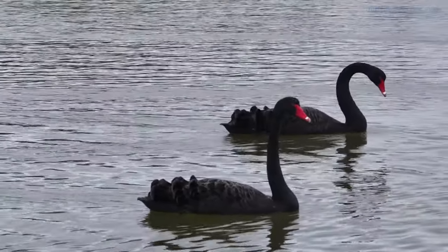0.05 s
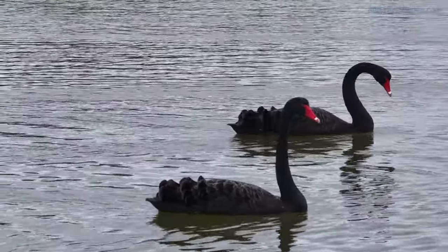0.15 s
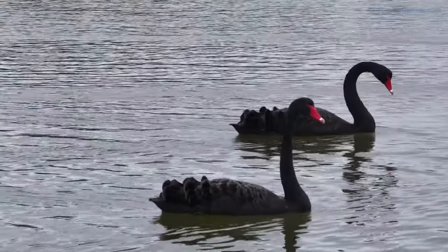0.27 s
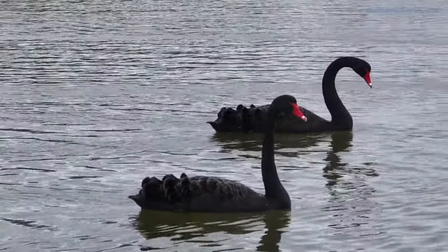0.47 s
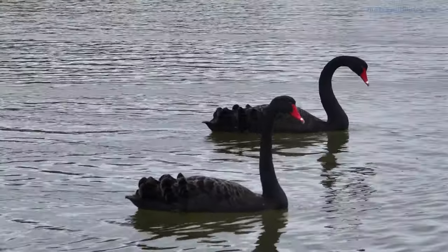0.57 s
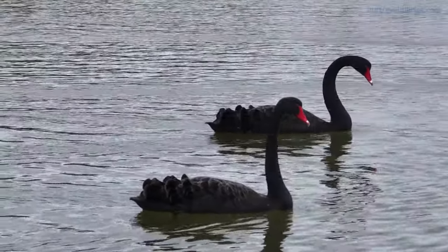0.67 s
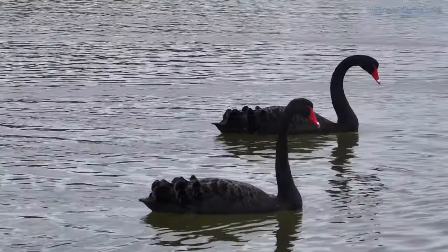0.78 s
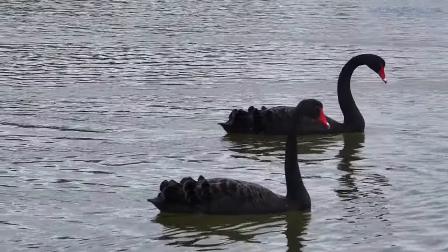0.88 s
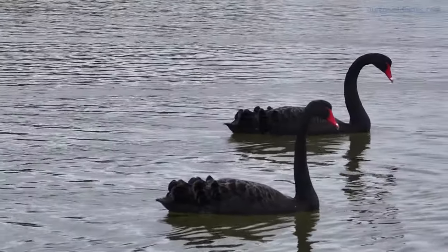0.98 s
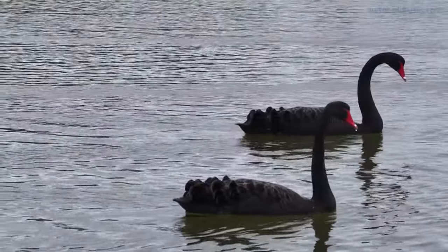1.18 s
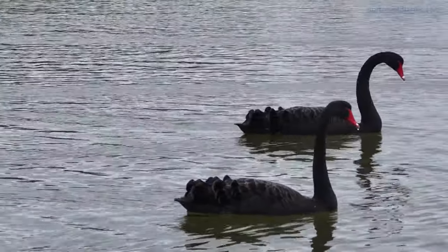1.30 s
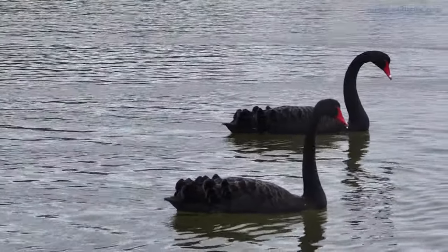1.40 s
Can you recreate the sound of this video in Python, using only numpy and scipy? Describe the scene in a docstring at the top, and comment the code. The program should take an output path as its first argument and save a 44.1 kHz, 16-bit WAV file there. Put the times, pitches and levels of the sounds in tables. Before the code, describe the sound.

A black swan honks once, starting with a rasp that clears into a falling bugle note and breaks lower. Soft breeze and ripples continue on the lake, with faint toots and chirps from distant birds.

```python
"""On a lake, a black swan calls once over a wash of breeze and ripples, in which tiny bubbles ring.
Its syrinx is the source and its throat the filter: a second vibration chops the start into a rasp,
which settles into a clear, sagging bugle note and then breaks to a lower one. Distant waterbirds toot,
a ripple slaps and a small bird chirps far off. Ripples and the bank scatter a faint echo of the calls."""
import sys
import numpy as np
from scipy import signal
from scipy.fft import rfft, irfft
from scipy.io import wavfile
from scipy.ndimage import uniform_filter1d

SR = 44100
rng = np.random.default_rng(int(sys.argv[2]) if len(sys.argv) > 2 else 0)


def master_out(mix):
    """Clip the mix to full scale and print it as 16-bit PCM to the path in sys.argv[1]."""
    frames = np.transpose(np.atleast_2d(mix))
    ceiling = np.clip(frames, -1, 1)
    pcm = np.round(ceiling * 32767).astype(np.int16)
    wavfile.write(sys.argv[1], SR, pcm)


N = 63945
T = np.arange(N) / SR

# spectrum of breeze and water (frequency [Hz], relative density [dB])
WASH_SPECTRUM = [(15, -63), (30, -35), (45, -20), (62, -12.5), (85, -4), (125, 1), (170, -2.5), (250, -4.5),
                 (325, -1.5), (480, -8), (650, -12.5), (830, -8.5), (1100, -12), (2500, -17.5), (3500, -23),
                 (5000, -31.5), (8000, -34), (12000, -40), (15800, -47)]
# clear droplets (time [s], ring frequency [Hz], relative level [dB], decay time [s])
DROPLETS = [(.0365, 10650, -44, 0.0005), (.192, 6200, -56, .001), (.698, 9200, -49, 0.00039),
            (.728, 5630, -54, 0.00046), (.801, 6970, -59, .001), (.833, 8050, -52.5, 0.00042),
            (0.932, 10700, -57, 0.00076), (.9663, 10900, -50, 0.00028), (1.008, 7150, -57, 0.00036),
            (1.037, 9900, -55, 0.00056), (1.1907, 7140, -40, 0.00033), (1.242, 5040, -58, 0.0015),
            (1.317, 10400, -42, 0.00021)]
# waterbird calls (time [s], duration [s], top pitch [Hz], relative level [dB])
WATERBIRD_TOOTS = [(.04, .034, 1005, -48), (.932, .022, 1600, -58)]
# the swan's two notes (time [s], pitch [Hz], relative level [dB], roll-off [dB per harmonic])
UPPER_NOTE = [(.205, 1165, -53, 4), (.215, 1252, -29, 5.5), (.222, 1207, -21.5, 0), (.25, 1208, -20, 1.5),
              (.268, 1226, -22.5, 1), (.282, 1230, -19, 0.5), (.305, 1194, -21, 1.5), (.33, 1180, -22.5, 1),
              (.375, 1177, -24.5, -0.5), (.41, 1170, -25, 0.5), (.445, 1150, -26, 0.5),
              (.475, 1124, -28.5, 0), (.501, 1079, -28, 0), (.508, 1108, -31.5, 11), (.515, 1023, -32, 5.5),
              (.524, 1050, -58, 10)]
LOWER_NOTE = [(.512, 980, -46, 3), (.52, 964, -33, 10.5), (.526, 958, -29, 2.7), (.542, 947.7, -31.5, -0.5),
              (.57, 921, -33, 0), (.586, 891, -34.5, 1), (.595, 886, -39, 4.5), (.604, 862, -46, 4),
              (.615, 868, -67, 3)]
# make-up of the rasp (time [s], share of the voice [0-1], pitch lift [Hz], roughness [0-1])
RASP_TEXTURE = [(.213, 0.91, 152.5, 0.42), (.2225, 0.71, 23, 0.48), (.233, 0.95, 119, 0.96),
                (.25, 0.97, 247, 1), (.263, 0.92, 206, 0.88), (.273, 0.84, 132, 0.25),
                (.297, 0.86, 63, 0.1), (.312, 0.38, 58, 0.08), (.335, 0.01, -2, 0.08)]
# the vibration that chops the voice (time [s], rate of main bursts [Hz])
CHOP_RATE = [(.213, 150), (.2226, 97), (.24, 102), (.258, 97), (.274, 118), (.294, 118), (.308, 142)]
# throat response in the rasp, the upper note and the lower note (frequency [Hz], relative gain [dB])
THROAT_RASP = [(300, -41), (700, -15.5), (880, -17), (985, 9.5), (1100, -14.5), (1220, -2), (1520, -4),
               (1900, -9), (2550, -10), (2850, -1.5), (3300, -7.5), (3800, 4), (4300, -10.5), (4900, -7.5),
               (5300, -2), (5750, -13), (6400, -34), (7100, -13.5), (8000, -8.5), (9200, -18), (10000, -42),
               (12000, -38.5), (15000, -57)]
THROAT_UPPER = [(1100, 0), (2200, -4.5), (2350, 0.5), (3250, 0), (3540, -1), (4400, -10.5), (4610, -25),
                (4720, -12), (5400, -23), (5650, -12), (5900, -24), (6700, -42), (7060, -28.5),
                (7800, -31.5), (8170, -40), (8260, -35.5), (9400, -53), (12000, -69.5)]
THROAT_LOWER = [(900, 1), (1770, -7.5), (1900, 0.5), (2700, -8), (2860, -8.5), (3650, 0.5), (3820, -4.5),
                (4450, -7.5), (4750, -24), (5600, -16), (6500, -41), (7300, -18.5), (7700, -44),
                (8600, -38), (11000, -68)]
# a lap of water (time [s], pitch [Hz], level [dB], duration [s])
WATER_LAPS = [(.632, 104, -47, .04)]
# a small bird's calls (time [s], duration [s], top pitch [Hz], level [dB])
BIRD_CHIRPS = [(.68, .04, 6150, -63), (1.153, .044, 6350, -59.5), (1.408, .042, 6350, -69)]


def amp(db):
    """Amplitude ratio: a factor of ten for every 20 dB."""
    return 10 ** (np.asarray(db) / 20)


def unit_rms(x):
    """Normalisation to unit mean power."""
    return x / np.sqrt(np.mean(x ** 2) + 1e-20)


def response_db(spectrum, hz):
    """A frequency response, interpolated on a logarithmic frequency axis."""
    frequencies, gains_db = np.transpose(spectrum)
    return np.interp(np.log(hz + 1), np.log(frequencies + 1), gains_db)


def filtered(x, spectrum):
    """Linear filtering multiplies a signal's spectrum by a frequency response."""
    return irfft(rfft(x) * amp(response_db(spectrum, np.fft.rfftfreq(N, 1 / SR))), N)


def contours(table):
    """Linear interpolation in time gives each column a value at every sample."""
    times, *columns = np.transpose(table)
    return [np.interp(T, times, column) for column in columns]


def wobble(hz):
    """Low-pass filtered noise is a smooth random fluctuation, here of unit rms."""
    lowpass = 1 / (1 + (np.fft.rfftfreq(N, 1 / SR) / hz) ** 4)
    return unit_rms(irfft(rfft(rng.standard_normal(N)) * lowpass, N))


def add(mix, start_s, sound):
    """Superposition: a sound adds to the mix from its starting time."""
    part = mix[max(round(start_s * SR), 0):][:len(sound)]
    part += sound[:len(part)]


def wash(level_db=-52.5, patch_db=0.82, swell_db=0.14):
    """Breeze and distant ripples sum incoherently to noise whose colour and level drift slightly."""
    spectrogram = signal.stft(rng.standard_normal(N), SR, nperseg=1024, noverlap=768)[2]
    patches = uniform_filter1d(rng.standard_normal(spectrogram.shape), size=12, axis=0)
    patches = unit_rms(uniform_filter1d(patches, size=10, axis=1))
    noise = signal.istft(spectrogram * amp(patch_db * patches), nperseg=1024, noverlap=768)[1][:N]
    return amp(level_db + swell_db * wobble(hz=4.3)) * unit_rms(filtered(noise, WASH_SPECTRUM))


def droplet(hz, level_db, decay_s, spray_gain=0.45):
    """A tiny bubble rings as a damped resonator inside a puff of narrow-band spray noise."""
    t = T[:SR // 50]
    band = signal.butter(2, [hz / 1.15, min(hz * 1.15, 12500)], "bandpass", fs=SR, output="sos")
    spray = unit_rms(signal.sosfilt(band, rng.standard_normal(len(t))))
    envelope = 2 * t / decay_s * np.exp(-t / decay_s)
    return amp(level_db) * envelope * (np.sin(2 * np.pi * hz * t) + spray_gain * spray)


def ripples(ticks_per_s=25):
    """Bubble resonances tick in the ripples: a few clear droplets among many faint, random ones."""
    out = np.zeros(N)
    for start_s, *drop in DROPLETS:
        add(out, start_s, droplet(*drop))
    for when, pitch, faintness in rng.random((int(ticks_per_s * N / SR), 3)):
        add(out, when * N / SR, droplet(4500 + 7000 * pitch, -61 - 10 * faintness, decay_s=0.0005))
    return out


def arched_tone(length_s, top_hz, level_db, arch):
    """Frequency modulation: a sine's pitch follows a parabola, lower at each end by the fraction arch."""
    u = np.linspace(-1, 1, int(length_s * SR))
    hz = top_hz * (1 - arch * u ** 2)
    return amp(level_db) * np.cos(np.pi * u / 2) * np.sin(2 * np.pi * np.cumsum(hz) / SR)


def waterbirds(gain_db=3):
    """Distant toots are near-pure tones, modulated by a shallow rise and fall in pitch."""
    out = np.zeros(N)
    for start_s, *note in WATERBIRD_TOOTS:
        add(out, start_s, amp(gain_db) * arched_tone(*note, arch=0.13))
    return out


def lake_echo(calls, gain_db=-27, t60_s=0.25, cutoff_hz=4500):
    """Scattering from ripples and the bank gives a faint, dull tail that decays exponentially."""
    tail = rng.standard_normal(N) * amp(-60 * T / t60_s)
    lowpass = signal.butter(2, cutoff_hz, fs=SR, output="sos")
    tail = signal.sosfilt(lowpass, tail / np.linalg.norm(tail))
    return amp(gain_db) * signal.fftconvolve(calls, tail)[:N]


def syrinx(note, jitter=0.002):
    """The syrinx is an oscillator: its phase, in cycles, is the integral of a slightly unsteady pitch."""
    hz, level_db, rolloff_db = contours(note)
    cycles = np.cumsum(hz * (1 + jitter * wobble(hz=514))) / SR
    sounding = (T > note[0][0]) & (T < note[-1][0])
    return hz, cycles, amp(level_db) * sounding, rolloff_db


def harmonics(cycles, colour_db, rolloff_db, dispersion_rad=0.51):
    """Dispersion in the long windpipe smears each pulse: harmonic k shifts in phase as k squared."""
    return sum(amp(colour_db(k) - rolloff_db * (k - 1))
               * np.cos(2 * np.pi * k * cycles + dispersion_rad * k * k) for k in range(1, 12))


def burst(centre_cycles, hz, half_width_s, rough, rolloff_db, jitter=0.058, shimmer=0.48):
    """Random frequency and amplitude modulation roughen a puff of tone, brightest in its middle."""
    t = np.arange(-SR // 100, SR // 100) / SR
    edge = np.minimum(abs(t / half_width_s), 4)
    cycles = np.cumsum(hz * (1 + jitter * rough * wobble(hz=885)[:len(t)])) / SR
    cycles += centre_cycles - cycles[len(t) // 2]
    tone = harmonics(cycles, colour_db=lambda k: 1.5, rolloff_db=rolloff_db + 2.5 * edge ** 2)
    flutter = 1 + shimmer * rough * wobble(hz=885)[:len(t)]
    return np.exp(-edge ** 4) * flutter * tone


def swan_rasp(hz, cycles, gain, rolloff_db, main_burst_s=0.2226, weak_hz=1150, weak_lead_s=0.00094):
    """Amplitude modulation by a second vibration chops the voice into bursts, strong and weak in turn."""
    _, lift_hz, rough = contours(RASP_TEXTURE)
    rate_hz, = contours(CHOP_RATE)
    beats = np.cumsum(rate_hz) / SR
    half_beat = np.floor(2 * (beats - np.interp(main_burst_s, T, beats)))
    half_width_s = 0.41 * (1 - 0.54 * rough) / rate_hz  # rough bursts are shorter
    out = np.zeros(N)
    for i in np.flatnonzero((np.diff(half_beat) > 0) & (gain[1:] > 0)) + 1:
        if half_beat[i] % 2 == 0:  # a main burst, pulled sharp
            puff = burst(cycles[i], hz[i] + lift_hz[i], half_width_s[i], rough[i], rolloff_db[i])
            lead_s = 0
        else:  # a weaker, lower, duller one just before the midpoint between two main bursts
            puff = burst(cycles[i], weak_hz, half_width_s[i], rough[i], rolloff_db[i] + 1.5)
            puff *= amp(-3) * rough[i]
            lead_s = weak_lead_s
        add(out, (i - len(puff) // 2) / SR - lead_s, gain[i] * puff)
    return filtered(out, THROAT_RASP)


def swan_upper_note(gain_db=-1.5):
    """Source and filter: the rasp settles into a clear, falling tone coloured by throat resonances."""
    hz, cycles, gain, rolloff_db = syrinx(UPPER_NOTE)
    rasp_share = contours(RASP_TEXTURE)[0]
    rasp = swan_rasp(hz, cycles, gain * rasp_share, rolloff_db)
    bugle = harmonics(cycles, lambda k: gain_db + response_db(THROAT_UPPER, k * hz), rolloff_db)
    return rasp + gain * (1 - rasp_share) * bugle


def swan_lower_note(gain_db=-0.5):
    """The oscillation breaks to a lower, softer tone whose upper harmonics fade first."""
    hz, cycles, gain, rolloff_db = syrinx(LOWER_NOTE)
    return gain * harmonics(cycles, lambda k: gain_db + response_db(THROAT_LOWER, k * hz), rolloff_db)


def water_lap():
    """A ripple slaps: a low oscillation lasting only a few cycles is heard as a dull thud."""
    out = np.zeros(N)
    for start_s, hz, level_db, length_s in WATER_LAPS:
        tone = arched_tone(length_s, hz, level_db, arch=0)
        add(out, start_s, tone * np.hanning(len(tone)))
    return out


def small_bird():
    """Fast frequency sweeps, up and down, make a high, near-pure tone into thin chirps."""
    out = np.zeros(N)
    for start_s, *note in BIRD_CHIRPS:
        add(out, start_s, arched_tone(*note, arch=0.19))
    return out


def scene():
    """The sources superpose in mono; distant birds have a higher ratio of echo to direct sound."""
    swan = swan_upper_note() + swan_lower_note()
    far_birds = waterbirds() + small_bird()
    echo = lake_echo(swan + amp(7) * far_birds)
    return (swan + far_birds + echo + wash() + ripples() + water_lap())[None]


def record(dry, cutoff_hz=15900):
    """Band limiting: a linear-phase low-pass filter removes the highest treble."""
    lowpass = signal.firwin(511, cutoff_hz, window=("kaiser", 9), fs=SR)
    return signal.oaconvolve(dry, lowpass[None], "same")


dry = scene()
out = record(dry)
master_out(out)
```